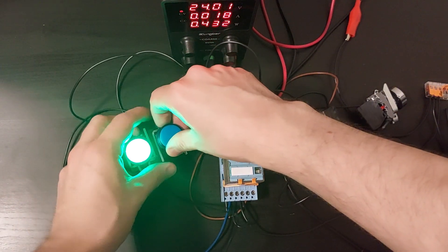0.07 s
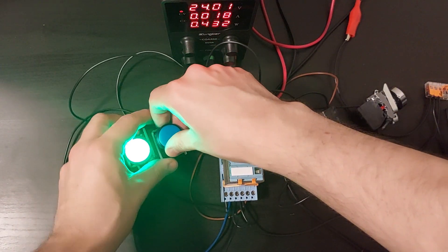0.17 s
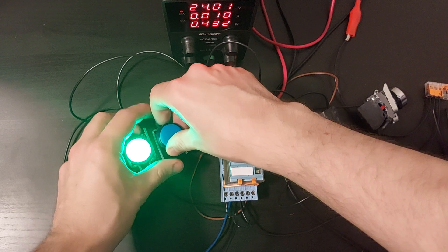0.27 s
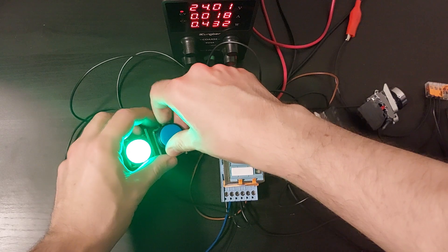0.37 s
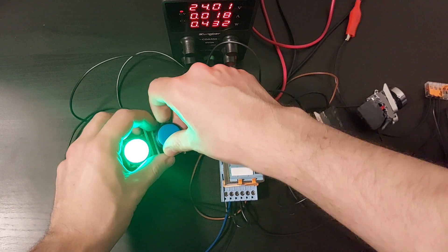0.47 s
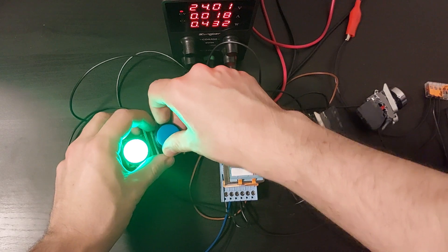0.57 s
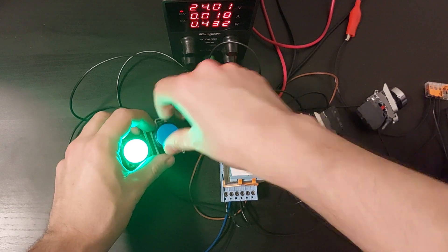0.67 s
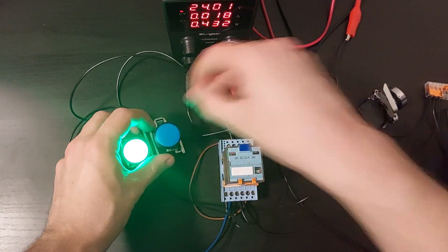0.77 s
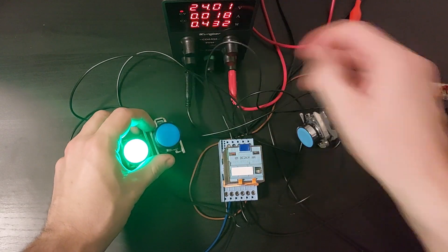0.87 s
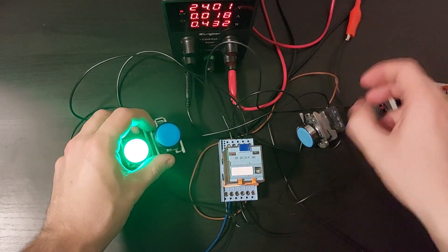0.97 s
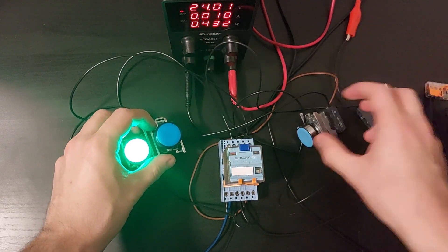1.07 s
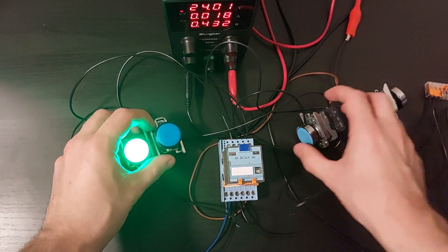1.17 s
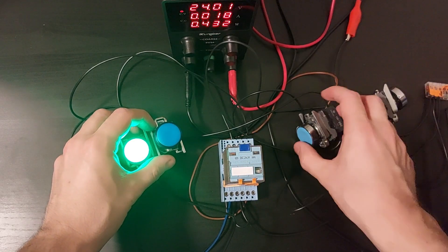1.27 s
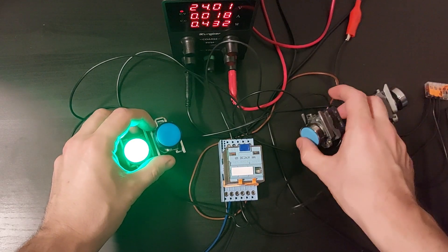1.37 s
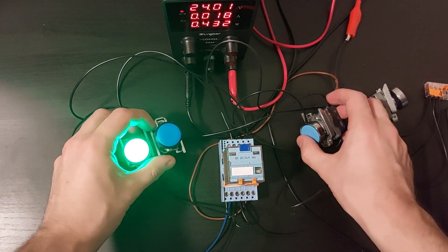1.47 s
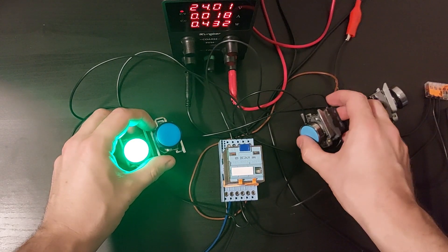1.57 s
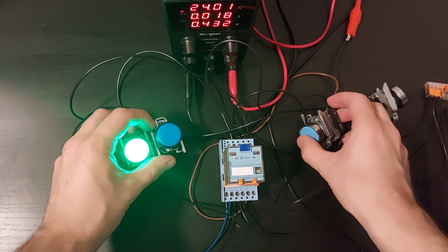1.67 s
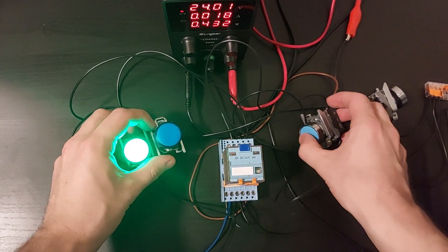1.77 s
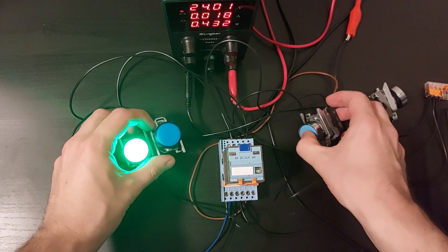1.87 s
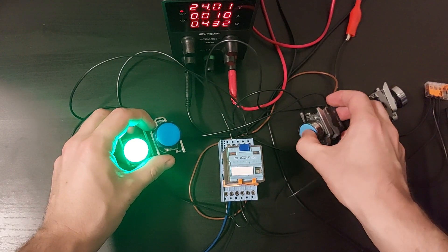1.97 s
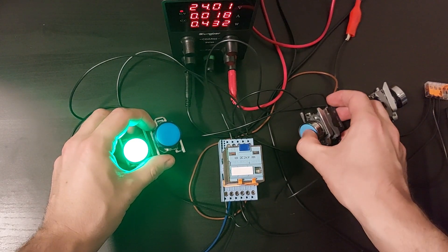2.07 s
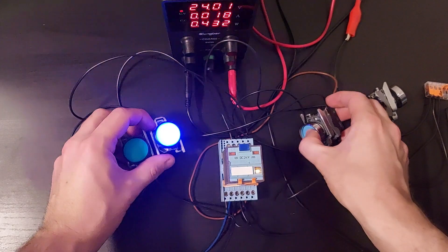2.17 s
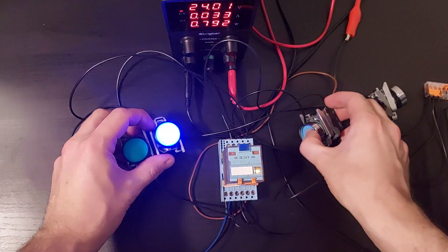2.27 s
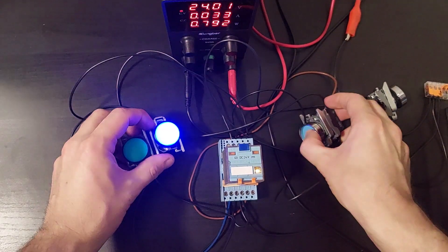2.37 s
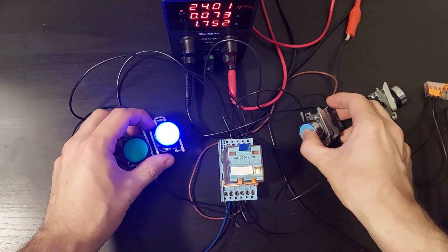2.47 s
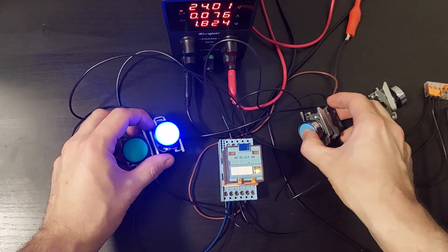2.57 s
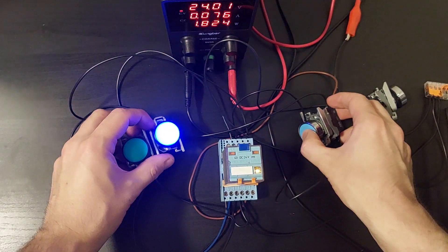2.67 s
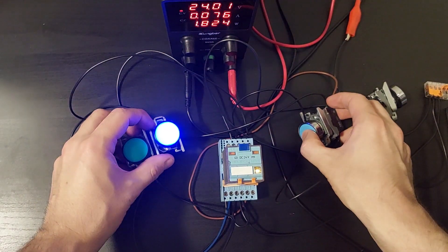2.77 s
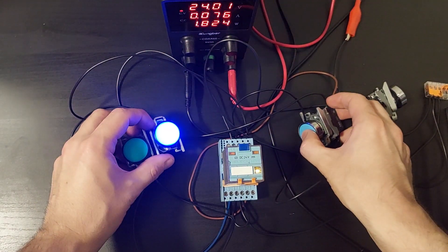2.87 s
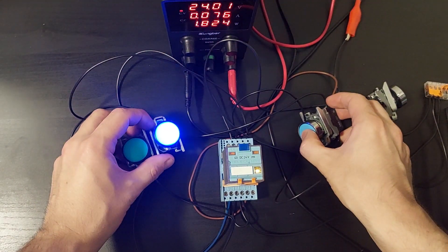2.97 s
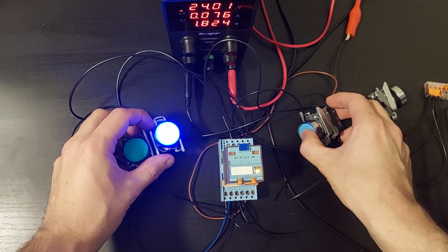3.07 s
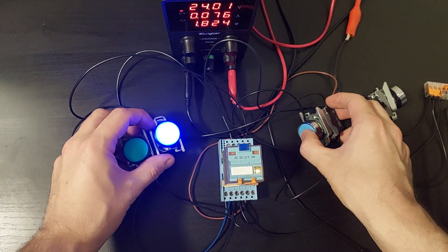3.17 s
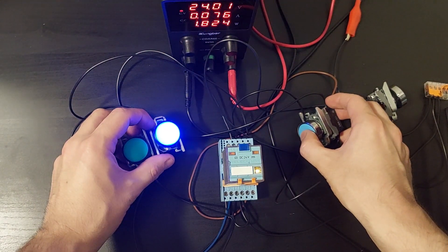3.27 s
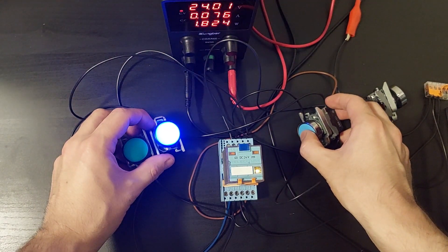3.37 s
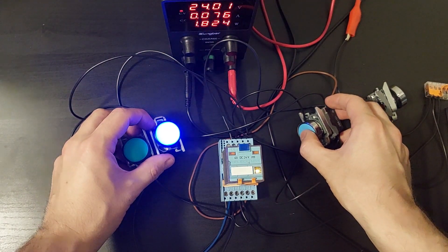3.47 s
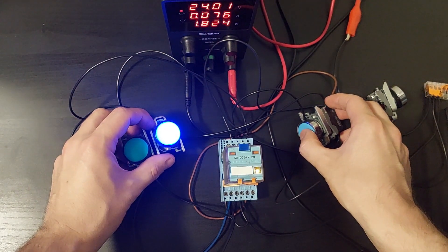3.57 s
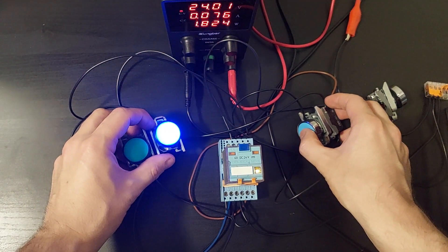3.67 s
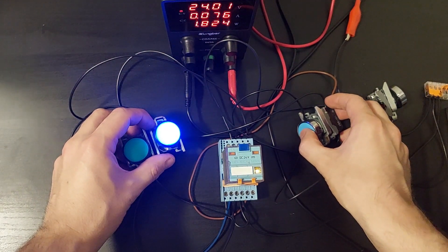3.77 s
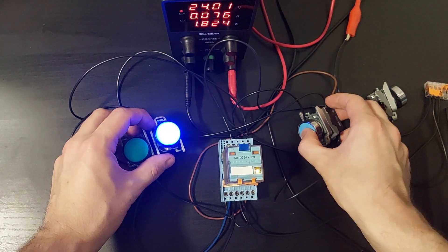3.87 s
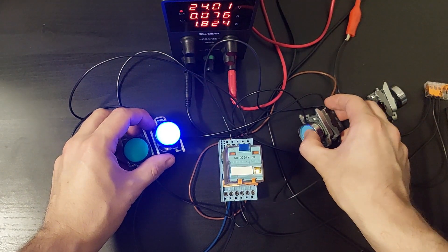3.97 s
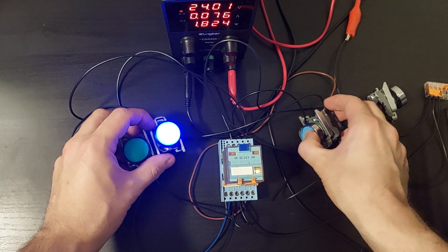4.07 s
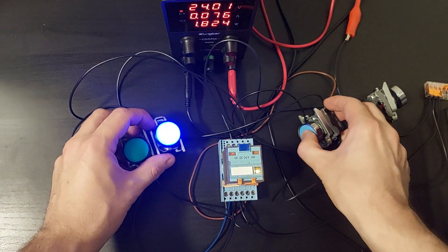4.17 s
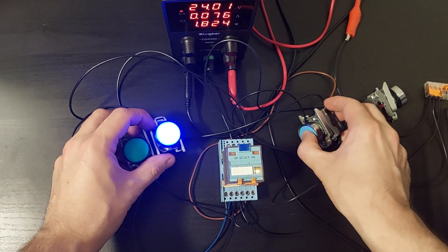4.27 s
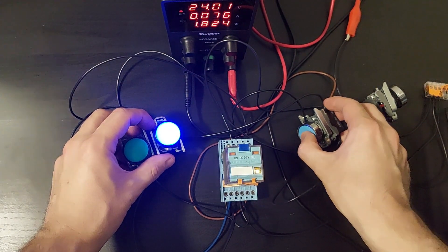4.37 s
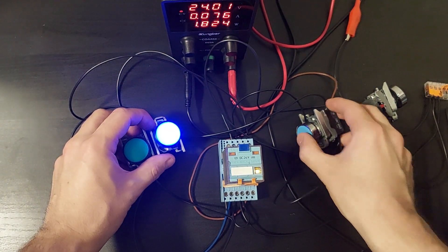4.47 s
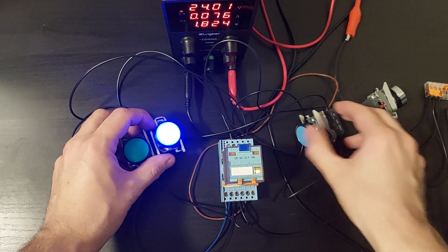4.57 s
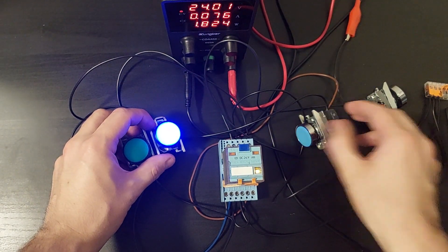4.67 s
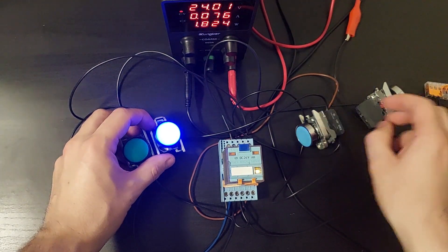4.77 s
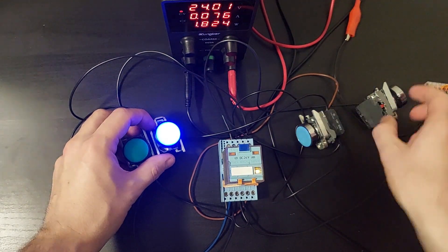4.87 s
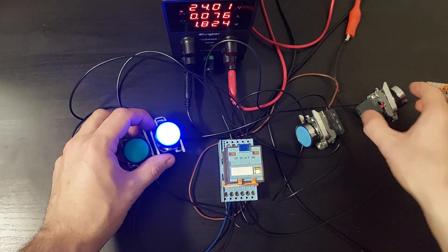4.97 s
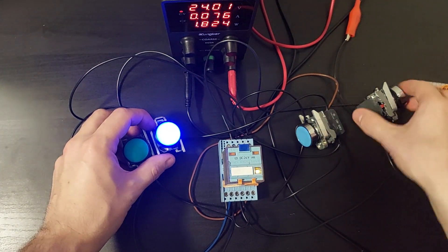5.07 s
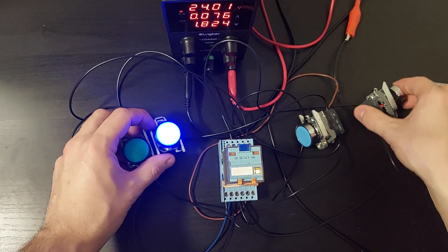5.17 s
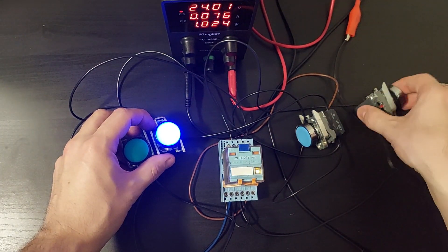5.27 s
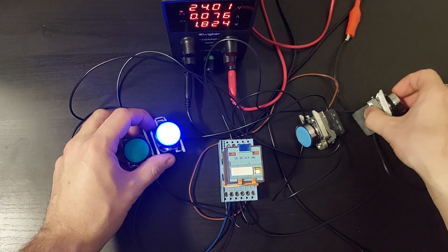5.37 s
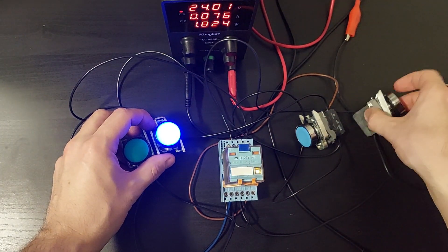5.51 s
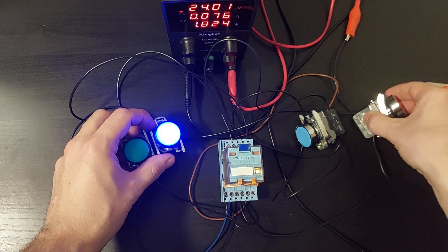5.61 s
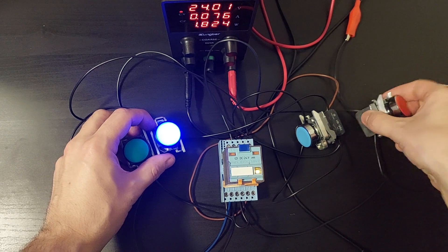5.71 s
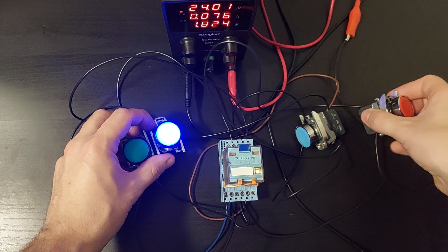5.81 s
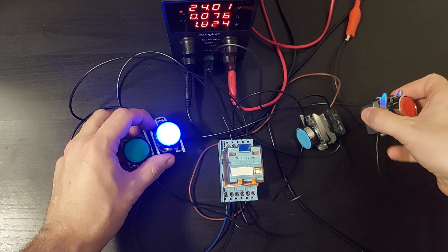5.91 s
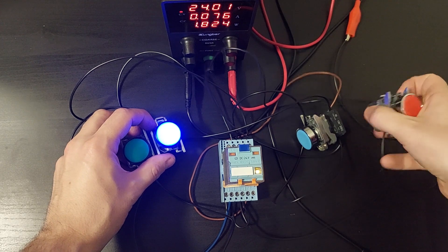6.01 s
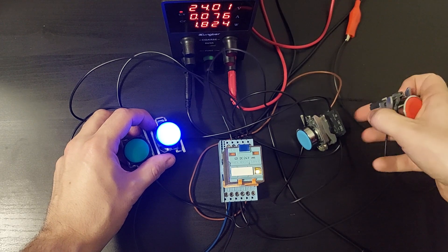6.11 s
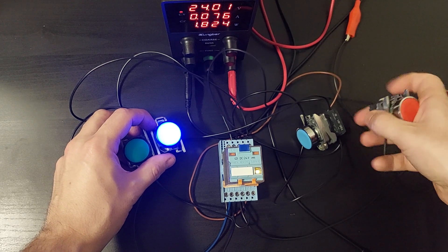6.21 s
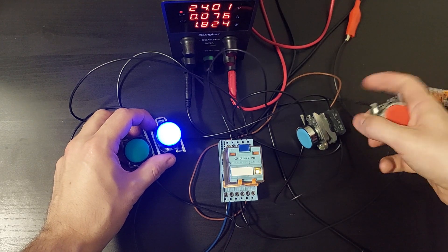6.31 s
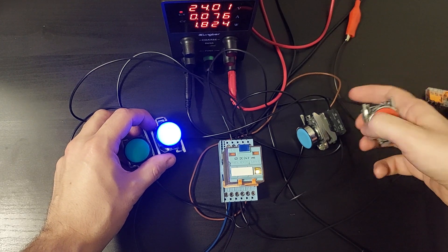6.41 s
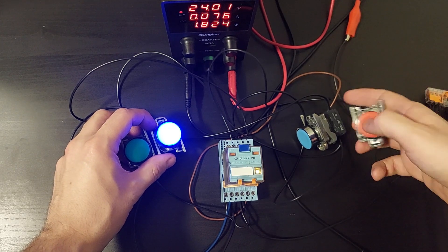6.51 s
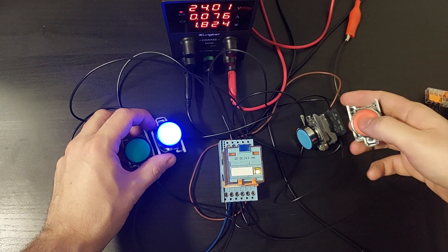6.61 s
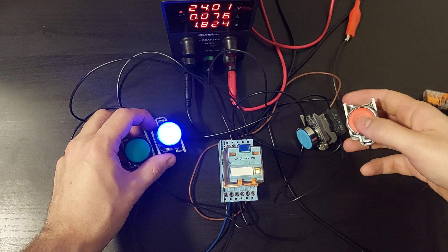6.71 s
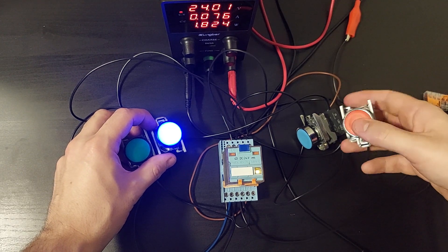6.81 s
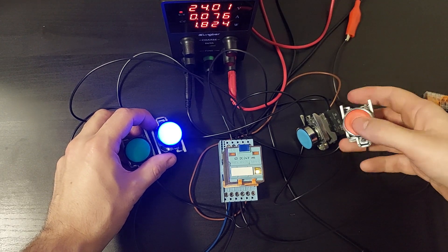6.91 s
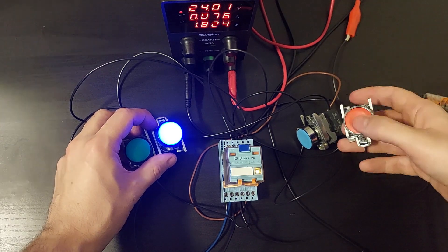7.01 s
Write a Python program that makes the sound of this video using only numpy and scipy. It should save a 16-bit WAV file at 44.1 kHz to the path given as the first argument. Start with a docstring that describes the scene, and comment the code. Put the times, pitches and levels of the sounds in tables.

```python
"""A knock on a wooden workbench over a low hum, heard from just above in a small room.
Industrial push buttons knock and click: cushioned blows ring the bench, and plastic cracks briefly.
One press pulls in a relay: a burst of impacts, then a ringing spring. A fingertip squeaks faintly.
Wires scrape in tiny slips, and another switch is picked up, its loose metal ticking in the hand.
A bench power supply hums throughout, made of plain sine tones, over faint air noise."""
import sys
import numpy as np
from scipy import signal
from scipy.fft import rfft, irfft, next_fast_len
from scipy.io import wavfile
from scipy.ndimage import uniform_filter1d

SR = 44100
rng = np.random.default_rng(int(sys.argv[2]) if len(sys.argv) > 2 else 0)


def master_out(mix):
    """Clip the mix to full scale and print it as 16-bit PCM to the path in sys.argv[1]."""
    frames = np.transpose(np.atleast_2d(mix))
    ceiling = np.clip(frames, -1, 1)
    pcm = np.round(ceiling * 32767).astype(np.int16)
    wavfile.write(sys.argv[1], SR, pcm)


N = 310905
TIME = np.arange(N) / SR   # seconds

# A housing bumps the bench. Each row: start in seconds, then relative levels in dB of the thud,
# the woody clack and the plastic rattle.
KNOCKS = [(0.0004, -25, -39.5, -35.5), (0.52, -36, -51.5, -71), (0.536, -27, -47, -74),
          (0.693, -40, -49.5, -49.5), (0.727, -35.5, -40, -54), (1.342, -54, -63, -64.5),
          (1.426, -43, -56.5, -78), (1.444, -33.5, -52.5, -64), (1.52, -34, -54.5, -76),
          (1.616, -33, -58, -54.5), (1.643, -37, -52.5, -60), (1.759, -42.5, -47, -57),
          (1.794, -38, -49, -66), (1.935, -48, -72.5, -88), (2.134, -54, -63, -57),
          (2.235, -40.5, -41.5, -63), (2.441, -37, -56.5, -63), (2.478, -41, -53.5, -52.5),
          (4.008, -43, -57.5, -63.5), (4.028, -39.5, -58, -56.5), (4.282, -53, -59.5, -58.5),
          (4.31, -52.5, -63, -60.5), (4.476, -50, -66, -82), (4.638, -54, -71.5, -85),
          (5.23, -46, -65.5, -71), (5.383, -31, -46, -53), (5.403, -31, -34, -39),
          (5.424, -27.5, -37.5, -37.5), (5.467, -44.5, -46.5, -43.5), (5.945, -42.5, -57, -75),
          (6.739, -52, -70, -85)]
# Tone of a plastic click. Each row: ratio to the body pitch, relative strength in dB per Hz.
CLICK_COLOUR = [(.2, -18.5), (.55, -13.5), (.82, 3.5), (1.0, 1), (1.15, -4), (1.45, -6), (2.0, -20.5),
                (4.0, -35)]
# Tone of the bright edge of a click or tick. Each row: frequency in Hz, relative strength in dB per Hz.
SNAP_COLOUR = [(2500, -17), (4500, -3.5), (7000, 2), (9000, -1), (12000, 3), (15500, -6)]


def from_db(db):
    """Turn decibels into a gain."""
    return 10 ** (np.asarray(db) / 20)


def at_hz(points, hz):
    """Read a table at any frequency, along a logarithmic frequency axis."""
    table_hz, values = np.transpose(points)
    return np.interp(np.log(np.maximum(hz, 1)), np.log(table_hz), values)


def scaled(rows, hz):
    """Turn a table of pitch ratios into a table in Hz."""
    return [(ratio * hz, *rest) for ratio, *rest in rows]


def panned(db):
    """Give left and right gains for a level difference; above zero, the left is louder."""
    return from_db(np.array([[db], [-db]]) / 2)


def add(out, s, sound):
    """Mix a sound in from a given time in seconds."""
    start = max(round(s * SR), 0)
    out[:, start:start + sound.shape[1]] += sound[:, :N - start]


def noise(colour, size=N, above_hz=0):
    """Coloured stereo noise, most alike on both sides in the bass; rms 1 above a given pitch."""
    # Each row: frequency in Hz, left-right likeness from 0 (unrelated) to 1 (the same).
    likeness = [(60, .9), (300, 0.47), (700, 0.28), (1500, 0.067), (4000, 0)]
    length = next_fast_len(size)
    hz = np.arange(length // 2 + 1) * SR / length
    mid, side = rfft(rng.standard_normal((2, length)))
    alike = at_hz(likeness, hz)
    gain = from_db(at_hz(colour, hz))
    gain = gain / np.sqrt(2 * np.mean(gain ** 2 * (hz >= above_hz)))
    shared = np.sqrt(1 + alike) * mid
    opposed = np.sqrt(1 - alike) * side * [[1], [-1]]
    return irfft(gain * (shared + opposed), length)[:, :size]


def crack(colour, t60, rise=.0001):
    """One blow excites modes too dense to tell apart, so fading noise stands in for them."""
    t = TIME[:SR // 4]
    fade = from_db(-60 * t / t60)   # t60: seconds to fall by 60 dB
    return noise(colour, size=len(t)) * fade * (1 - np.exp(-t / rise))


def ring(modes, scatter_db, rise=.0001):
    """One blow rings every mode with its own strength; short waves reach the two sides out of step."""
    hz, db, t60 = np.transpose(modes)[:, :, None]
    t = TIME[:int(t60.max() * SR)]
    strength = from_db(db + scatter_db * rng.standard_normal(hz.shape) - 60 * t / t60)
    apart = np.minimum(hz / 1800, np.pi / 4) * rng.choice([-1, 1], hz.shape)   # radians
    phase = np.array([apart, -apart]) + np.pi / 2 * np.arange(len(hz))[:, None]
    tones = strength * np.sin(2 * np.pi * hz * t - phase)
    return np.sum(tones, axis=1) * (1 - np.exp(-t / rise))


def room(x, wet_db):
    """Add reflections from bench and walls as a dense noise tail, whose lowest bass lasts longest."""
    # Each row: frequency in Hz, time in seconds for the reflections to fall by 60 dB.
    room_t60 = [(200, 0.36), (1000, 0.21), (4000, 0.1857), (9000, 0.24), (15000, 0.2)]
    t, tail = TIME[:SR // 2], 0
    edges = np.geomspace(100, 17000, 11)   # band limits in Hz
    for low, high in zip(edges, edges[1:]):
        band_filter = signal.butter(2, [low, high], "band", fs=SR, output="sos")
        band = signal.sosfilt(band_filter, noise([(1, 0)], size=len(t)))
        t60 = at_hz(room_t60, np.sqrt(low * high))
        tail = tail + band * from_db(-60 * t / t60)
    tail = tail * (t > .002)   # no reflection arrives in the first 2 ms
    tail = tail / np.sqrt(np.sum(tail ** 2) / 2)
    return x + from_db(wet_db) * signal.fftconvolve(x, tail, axes=1)[:, :N]


def hum():
    """The power supply's fan sounds two steady tones; a second hum swells and fades over air noise."""
    # Tones of the fan. Each row: frequency in Hz, level in dB before panning.
    fan_lines = [(66.1, -65), (132.2, -69)]
    # Swelling of the second hum. Each row: time in seconds, relative level in dB.
    hum_levels = [(0.0, -58), (0.16, -75), (0.55, -55), (0.76, -72.5), (1.25, -55), (1.65, -64),
                  (1.98, -52), (2.63, -61.5), (2.77, -54.5), (3.16, -56.5), (3.4, -69.5), (5.01, -68),
                  (5.44, -48), (5.75, -70.5), (6.09, -57), (6.48, -58.5), (6.81, -80), (7.05, -69)]
    # Tone of the still room. Each row: frequency in Hz, relative strength in dB per Hz.
    air_colour = [(20, -42.5), (48, -21), (65, -12.5), (80, -20), (135, -14.5), (165, -29), (270, -27),
                  (420, -36.5), (620, -41), (1900, -48), (5500, -58), (9500, -53.5), (12500, -56.5),
                  (15000, -70.5)]
    hum_hz, hum_db, air_db = 96, -1, -78.5
    fan = np.zeros(N)
    for hz, db in fan_lines:
        fan += np.sqrt(2) * from_db(db) * np.sin(2 * np.pi * (hz * TIME + rng.random()))
    level = from_db(hum_db + np.interp(TIME, *np.transpose(hum_levels)))
    swell = np.sqrt(2) * level * np.sin(2 * np.pi * hum_hz * TIME)
    air = from_db(air_db) * noise(air_colour, above_hz=297)
    return panned(2.0) * fan + panned(-3.5) * swell + air


def squeak():
    """A fingertip sticks and slips on the plastic button: a faint, unsteady tone."""
    # Path of the squeak. Each row: time in seconds, pitch in Hz, relative level in dB.
    squeak_path = [(1.2, 2230, -105), (1.222, 2310, -83), (1.282, 2312, -77.5), (1.41, 2230, -95),
                   (1.448, 2163, -72.5), (1.536, 2170, -94), (1.584, 2290, -72), (1.664, 2260, -84),
                   (1.7, 2145, -92)]
    squeak_db = 1.5
    s, hz, db = np.transpose(squeak_path)
    slow = signal.butter(2, 70, fs=SR, output="sos")   # keeps the wavering below about 70 Hz
    waver = signal.sosfilt(slow, rng.standard_normal((2, N)))
    tone = np.sin(2 * np.pi * np.cumsum(np.interp(TIME, s, hz)) / SR)
    level = np.interp(TIME, s, from_db(db + squeak_db), left=0, right=0)
    return room(level * tone * waver / waver.std(), wet_db=1.0)


def rubbing():
    """Wires sliding over the bench catch and slip in many tiny grains, swelling and stopping."""
    # Each row: start in seconds, length in seconds, relative level in dB, treble limit in Hz.
    scrapes = [(0.666, 0.041, -63.5, 3000), (1.715, 0.063, -62, 2820), (5.326, 0.15, -55.5, 2700),
               (5.516, 0.12, -61, 2470), (5.734, 0.16, -65, 2460), (5.927, 0.18, -59.5, 2090),
               (6.014, .11, -58, 6000), (6.502, .07, -64, 2420), (6.721, 0.15, -68, 1570)]
    # Tone of the scraping. Each row: frequency in Hz, relative strength in dB per Hz.
    scrape_colour = [(150, -37), (350, 4.5), (700, -3), (1000, -0.5), (1900, -0.5), (4000, -12),
                     (15000, -10)]
    slips_per_s = 1500
    out = np.zeros((2, N))
    for start, length, db, top_hz in scrapes:
        t = TIME[:int(length * SR)]
        speed = np.interp(t / length, [0, 0.5, 1], [0, 1, 0])   # fastest halfway through
        slips = rng.exponential(1, len(t)) * (rng.random(len(t)) < slips_per_s / SR)
        grain = uniform_filter1d(slips, size=120)
        dull = signal.butter(2, top_hz, fs=SR, output="sos")
        hiss = signal.sosfilt(dull, noise(scrape_colour, size=len(t))) * grain
        add(out, start, from_db(db) * speed * hiss / hiss.std())
    return room(out, wet_db=-1.5)


def lifted_switch():
    """Loose metal parts of the lifted switch ring briefly, at a pitch that shifts with the grip."""
    # Each row: start in seconds, relative levels in dB of ring and bright snap, main ring pitch in Hz.
    ticks = [(5.335, -63, -71.5, 2630), (5.4287, -38.5, -48, 2490), (5.444, -41, -53, 2530),
             (5.51, -42, -55, 2666), (5.5953, -43.5, -64.5, 2460), (5.836, -66, -63.5, 2626),
             (6.143, -50, -51.5, 2780), (6.308, -44.5, -54, 2540), (6.461, -61, -67.5, 2600),
             (6.516, -54, -84, 2260), (6.6118, -42.5, -56.5, 2556), (6.6449, -45.5, -56, 2506)]
    # Ringing tones. Each row: ratio to the main ring, relative level in dB, seconds to fall by 60 dB.
    switch_modes = [(0.929, -4, 0.048), (0.974, -5, 0.055), (1.002, -2, 0.031), (1.051, -10, 0.019),
                    (1.11, -7.5, 0.051), (1.209, -13, 0.045), (1.52, -13, 0.052), (2.47, -16.5, 0.052),
                    (3.03, -33, 0.051), (4.35, -22, 0.044)]
    metal = np.zeros((2, N))
    for s, ring_db, snap_db, main_hz in ticks:
        body_colour = scaled(CLICK_COLOUR, 1.13 * main_hz)
        add(metal, s, from_db(ring_db - 5.5) * ring(scaled(switch_modes, main_hz), scatter_db=2.0))
        add(metal, s, from_db(ring_db - 6.5) * crack(body_colour, t60=0.046))
        add(metal, s, from_db(snap_db + 3.0) * crack(SNAP_COLOUR, t60=0.026))
    return room(metal, wet_db=-1)


def relay():
    """Impacts a few milliseconds apart fuse into one snap; the last sets frame and spring ringing."""
    # The armature starts, meets the contacts and slams home. Each row: start in seconds, relative level in dB.
    impacts = [(2.2144, -50), (2.2277, -42.5), (2.2301, -26), (2.2318, -19.5), (2.2338, -27)]
    # Tone of the impacts. Each row: frequency in Hz, relative strength in dB per Hz.
    relay_colour = [(350, -62), (600, -21), (869, -15.5), (1260, -14), (1390, -5.5), (1800, -14),
                    (2210, -7.5), (3250, -16.5), (3530, 2.5), (4280, -8.5), (5710, -5), (6460, -9),
                    (10700, -16), (11700, -6), (16000, -11.5)]
    # Ringing of the frame. Each row: frequency in Hz, relative level in dB, seconds to fall by 60 dB.
    relay_modes = [(1397, -14, .16), (1517, -21.5, .15), (2270, -19.5, 0.24), (3490, -20, 0.2),
                   (3730, -14.5, 0.1), (3662, -24, 0.33), (3845, -21.5, 0.12), (5515, -34.5, 0.36),
                   (5744, -20, 0.088), (5870, -20, 0.18), (6400, -21, .14), (9300, -25.5, 0.17)]
    # Ringing of the spring, with the same columns as the frame.
    spring_modes = [(2212, -59, 1.25), (3613, -58, .8)]
    snap, ringing = np.zeros((2, 2, N))
    for s, db in impacts:
        add(snap, s, from_db(db) * crack(relay_colour, t60=.035))
    home_s, home_db = impacts[-1]
    add(ringing, home_s, from_db(home_db) * ring(relay_modes, scatter_db=3.0))
    add(ringing, home_s, ring(spring_modes, scatter_db=2.5))
    return panned(-1.3) * room(snap, wet_db=-3.0) + panned(-2.5) * ringing


def buttons():
    """Plastic housings click with a bright edge, when a plunger snaps and when they are knocked."""
    # A plunger snaps in or out. Each row: start in seconds, relative levels in dB of the body
    # and the bright snap, body pitch in Hz.
    clicks = [(0.7295, -35.5, -63, 2930), (0.9765, -52.5, -58, 2310), (1.759, -64, -59, 2640),
              (2.4523, -52, -63, 4100), (2.549, -65, -59.5, 3700), (4.0014, -64.5, -55, 2167),
              (4.244, -51, -59.5, 5440), (4.283, -59, -70, 3520)]
    rattle_hz, rattle_snap_db = 2500, -17   # body pitch; bright edge against the rattle, before trims
    plastic = np.zeros((2, N))
    rattles = [(s, db, db + rattle_snap_db, rattle_hz) for s, _, _, db in KNOCKS]
    for s, body_db, snap_db, body_hz in [*clicks, *rattles]:
        add(plastic, s, from_db(body_db - 5.0) * crack(scaled(CLICK_COLOUR, body_hz), t60=0.051))
        add(plastic, s, from_db(snap_db + 1.5) * crack(SNAP_COLOUR, t60=0.026))
    return room(plastic, wet_db=-1.0)


def bumps():
    """List every blow on the bench: knocks, one softer rock back after each, and nudges of the fingers."""
    # Fingers shift their grip. Each row: start in seconds, end in seconds, relative level in dB.
    grips = [(0.222, 0.5, -58.5), (1.275, 1.75, -50.5), (2.083, 2.22, -51), (2.53, 2.7, -57),
             (3.849, 4.0, -60.5), (4.047, 4.09, -47.5), (4.202, 4.6, -61)]
    settle_s, settle_db = 0.027, -12   # typical delay and level of the rock back
    nudges_per_s, nudge_spread_db, nudge_clack_db = 24, 1.5, -19.5
    blows = []   # each: start in seconds, thud dB, clack dB
    for s, thud_db, clack_db, _ in KNOCKS:
        settled = s + settle_s * rng.uniform(.7, 1.3)
        blows.append((s, thud_db, clack_db))
        blows.append((settled, thud_db + settle_db, clack_db + settle_db))
    for start, end, grip_db in grips:
        for s in np.arange(start, end, 1 / nudges_per_s):
            db = grip_db + nudge_spread_db * rng.standard_normal()
            nudge_s = s + rng.uniform(-.5, 0.54) / nudges_per_s
            blows.append((nudge_s, db, db + nudge_clack_db))
    return blows


def bench():
    """Cushioned bumps thud and clack; the housing shudders on while the hand bears down."""
    # Ringing of the bench top. Each row: frequency in Hz, relative level in dB, seconds to fall by 60 dB.
    bench_modes = [(251.4, -8.5, 0.25), (307, -5, 0.13), (325.35, 1.5, 0.25), (358.6, -5, 0.19),
                   (452, -8, 0.11), (533.4, -4.5, 0.18)]
    # Ringing of the rocking bench, with the same columns as the bench top.
    frame_modes = [(59, -3.5, 0.25), (79.8, 4, 0.18), (138.5, 10.5, 0.06)]
    # The bench rocks as the switch is tugged off it. Each row: start in seconds, relative level in dB.
    jolt_times = [(5.34, -47), (5.358, -35.5)]
    # Tone of the woody clack. Each row: frequency in Hz, relative strength in dB per Hz.
    clack_colour = [(200, -12), (600, 2), (1100, 2), (1800, -3.5), (2500, -15), (4000, -30), (8000, -48.5)]
    # Tone of the shuddering housing. Each row: ratio to the thud's pitch, relative strength in dB per Hz.
    shudder_colour = [(.45, -17), (.65, -15), (.82, -2.5), (1.05, 2.5), (1.35, -7.5), (1.8, -14),
                      (2.3, -20), (3.6, -37.5), (7.0, -63)]
    # Where the hand works. Each row: time in seconds, left-right difference in dB, thud centre in Hz.
    hand_place = [(0.0, -1, 317), (0.53, 1, 270), (0.751, 0.5, 264), (1.399, -2.5, 346), (5.4, -4, 339.2),
                  (6.998, -1.5, 330.6)]
    thuds, clacks, jolts = np.zeros((3, 2, N))
    place_s, place_pan_db, place_hz = np.transpose(hand_place)
    for s, thud_db, clack_db in bumps():
        pan = panned(np.interp(s, place_s, place_pan_db))
        centre_hz = np.interp(s, place_s, place_hz)
        # a soft contact cannot excite the modes far above its own pitch
        modes = [(hz, db - 20 * np.log10(1 + (hz / centre_hz / 1.7) ** 5), t60)
                 for hz, db, t60 in bench_modes]
        shudder = crack(scaled(shudder_colour, centre_hz), t60=0.15, rise=0.0059)
        add(thuds, s, from_db(thud_db - 8.5) * pan * ring(modes, scatter_db=0.95, rise=0.0029))
        add(thuds, s, from_db(thud_db - 4.0) * pan * shudder)
        add(clacks, s, from_db(clack_db - 1.0) * crack(clack_colour, t60=0.091, rise=0.00429))
    for s, db in jolt_times:
        add(jolts, s, from_db(db) * panned(-8) * ring(frame_modes, scatter_db=1, rise=.012))
    return room(thuds, wet_db=-13.5) + room(clacks, wet_db=-4) + jolts


def scene():
    """Add up everything on the bench, from the background hum to the knocks."""
    return hum() + squeak() + rubbing() + lifted_switch() + relay() + buttons() + bench()


def record(dry):
    """Cut the treble steeply."""
    cutoff_hz = 15900
    return signal.sosfilt(signal.ellip(10, .1, 70, cutoff_hz, fs=SR, output="sos"), dry)


dry = scene()
out = record(dry)
master_out(out)
```